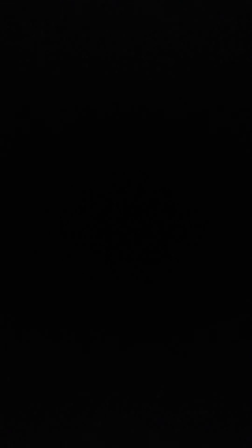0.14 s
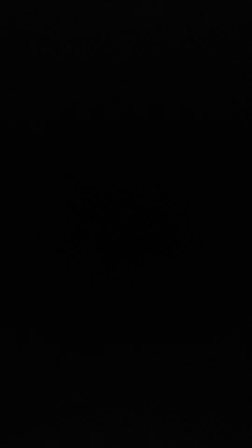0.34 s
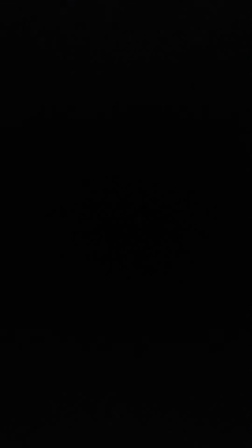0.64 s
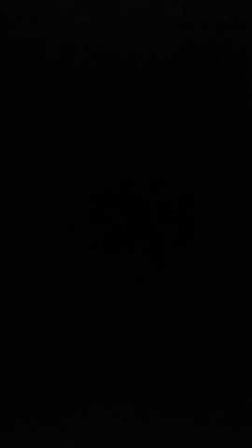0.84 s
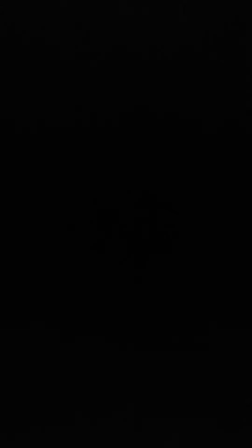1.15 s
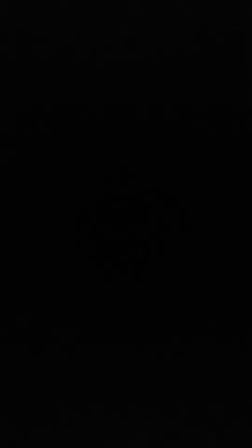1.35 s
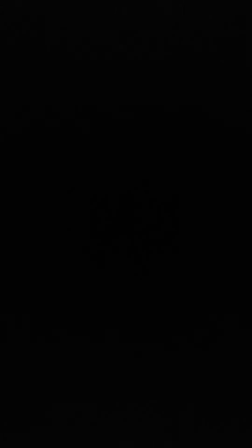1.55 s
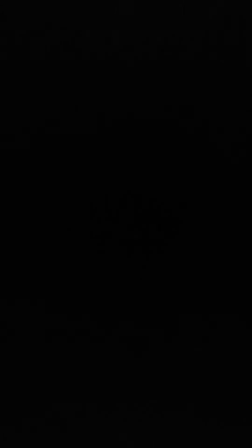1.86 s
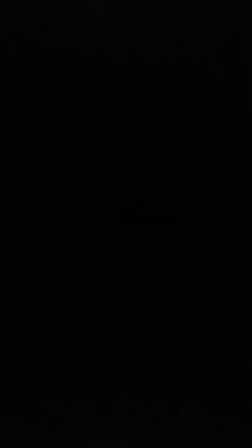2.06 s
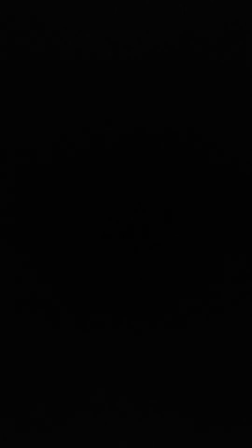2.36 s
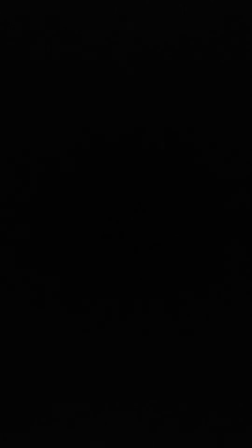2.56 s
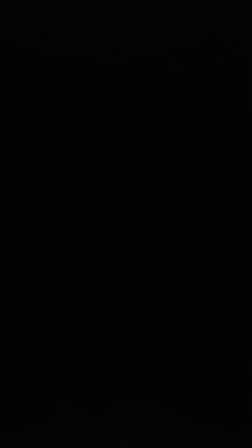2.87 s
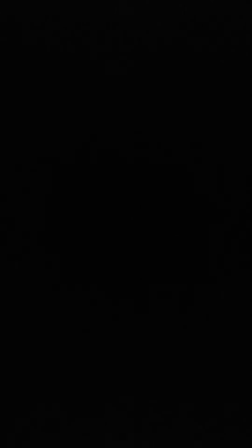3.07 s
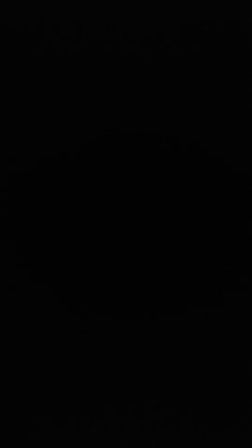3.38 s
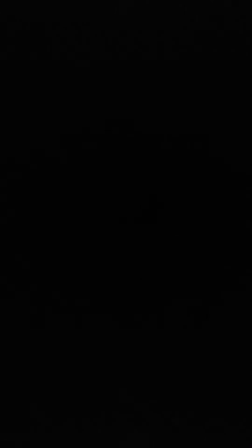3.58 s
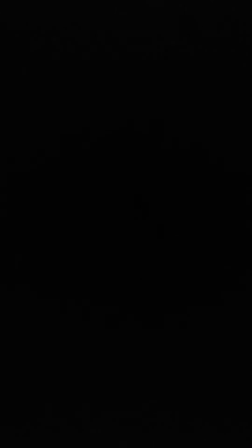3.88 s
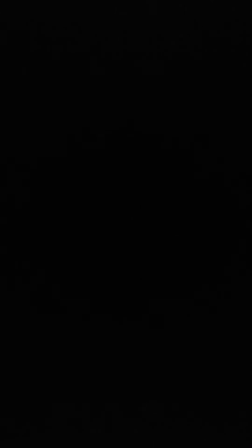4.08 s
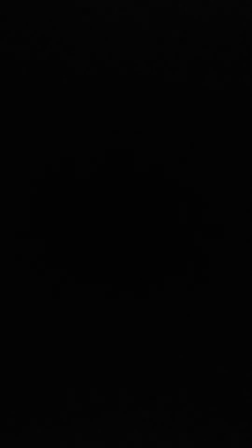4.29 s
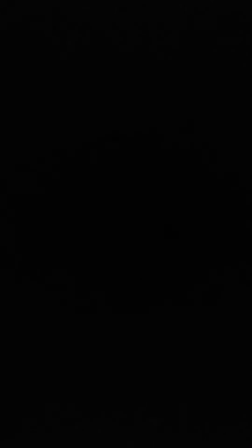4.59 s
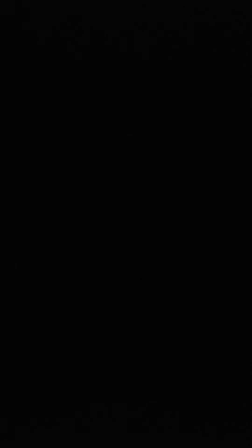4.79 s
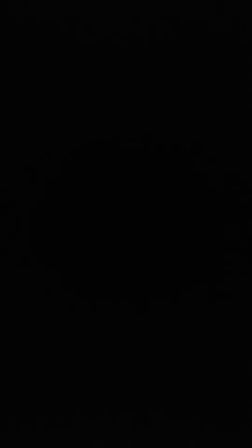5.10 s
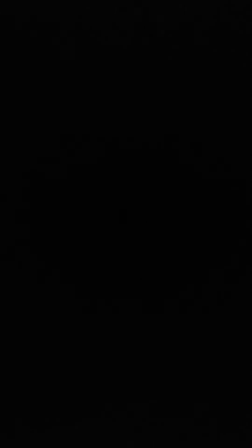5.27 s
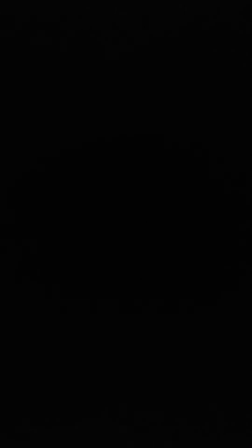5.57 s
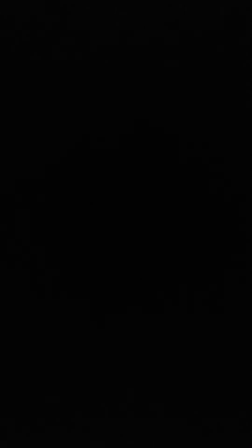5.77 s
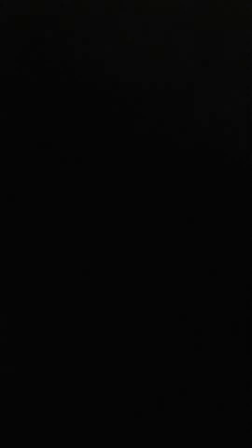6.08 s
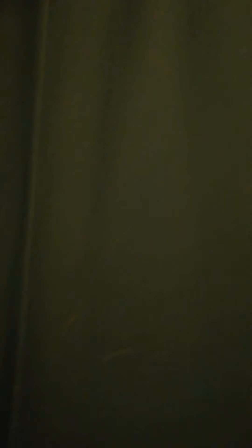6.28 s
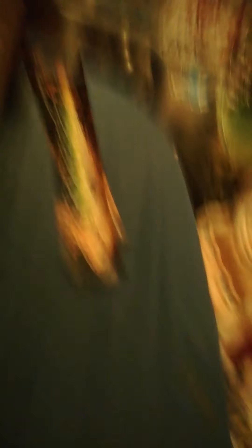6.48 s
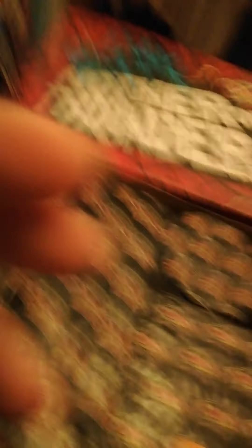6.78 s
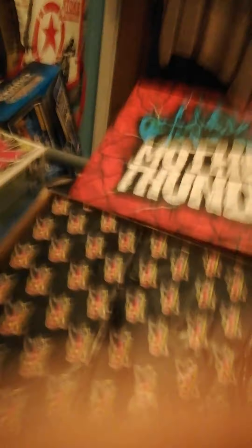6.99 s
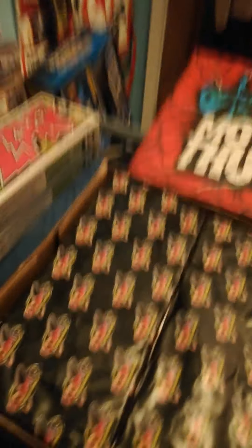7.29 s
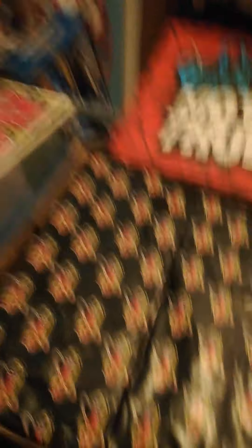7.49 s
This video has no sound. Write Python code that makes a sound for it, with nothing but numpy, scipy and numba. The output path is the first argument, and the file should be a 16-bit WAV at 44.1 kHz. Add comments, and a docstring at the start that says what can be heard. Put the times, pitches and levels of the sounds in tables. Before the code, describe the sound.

A phone bumps down close by, then a tight cardboard box lid is rubbed, knocked and worked off in a small, quiet room.

```python
"""Bumps and rubbing come first: a phone is set down in a small room, its case right by the microphone ports.
A tight cardboard lid knocks, judders off its box as it sticks and slips, and is put aside.
Fingertips swipe over the card. Then the phone is picked up, and its case creaks in a few sharp ticks.
Hands keep up a low rumble, over quiet room air, an appliance's hum and a fan's whirr."""
import sys
import numpy as np
from scipy import signal
from scipy.fft import rfft, irfft, next_fast_len
from scipy.io import wavfile
from numba import njit

SR = 44100
rng = np.random.default_rng(int(sys.argv[2]) if len(sys.argv) > 2 else 0)


def wav_out(sig):
    """Save sig, one row per channel (or a flat mono array), as 16-bit PCM at SR to the path in sys.argv[1]."""
    wavfile.write(sys.argv[1], SR, np.round(np.clip(np.atleast_2d(sig).T, -1, 1) * 32767).astype(np.int16))


N = 337188
TIME = np.arange(N) / SR
RING_TIME = TIME[:16384]  # the clock for one short sound [s]


# Tone of the tick where the phone is hit: (frequency [Hz], level [dB])
CONTACT_TONE = [(150, 2), (650, 2.5), (1200, -0.5), (2200, -12), (4500, -18), (10000, -16.5), (16000, -41)]
# Blows to the phone: (time [s], rocking [dB], rocking pitch [Hz], case knock [dB], contact tick [dB])
PHONE_BUMPS = [(0.019, -20.5, 197, -18.5, -21.5), (0.037, -17.5, 225, -23, -12.5),
               (0.257, -21, 182, -22, -21), (0.387, -25, 191, -40, -51), (0.397, -28, 198, -37, -30),
               (0.621, -19.5, 223, -31, -47), (0.642, -19.5, 124, -35, -47), (0.68, -18, 212, -39, -51),
               (0.689, -12, 208, -20, -48), (0.811, -24.5, 215, -32, -32), (0.856, -20.5, 130, -21.5, -35),
               (1.024, -24, 247, -42, -51), (1.077, -10.5, 165, -48, -39), (1.485, -34, 294, -61, -35.5),
               (1.75, -22, 197, -33, -36), (1.884, -22, 203, -32, -43), (2.36, -27, 135, -33, -58),
               (2.683, -17, 149, -22.5, -34), (2.71, -23.5, 234, -41, -52), (3.098, -43, 240, -48, -66),
               (3.538, -29, 170, -28, -56), (3.676, -23.5, 94.5, -31, -37), (4.192, -31.5, 83, -33.5, -56),
               (4.442, -22, 152, -41, -38), (4.449, -19, 119, -21, -50), (5.584, -29.5, 73, -44, -48),
               (5.702, -25, 66.6, -60, -43), (5.917, -24, 133, -46, -32), (6.034, -29, 119, -44, -38),
               (6.193, -32.5, 205, -46, -40), (6.246, -30, 89, -63, -50), (6.293, -33, 86.6, -62, -68),
               (6.985, -48, 329, -34, -57), (7.041, -27.5, 163, -38, -55), (7.094, -27.5, 103, -25, -28),
               (7.483, -42.5, 101, -48, -50)]

def bumps():
    """A blow rocks the phone on its soft support for a cycle or so; the case knocks, the contact ticks."""
    case_hz, case_ring_s = 328, 0.021
    flex_gain = undb([[-9], [0]])  # the case bends more at the right port
    out = np.zeros((2, N))
    for s, db, hz, knock_db, tick_db in PHONE_BUMPS + bounces():
        cycles = RING_TIME * hz
        rocking = -np.sin(2 * np.pi * cycles) * cycles ** 2.76 * np.exp(-cycles / 0.21)
        knock_hz = case_hz * (1 + 0.17 * rng.standard_normal())
        knock = -np.sin(2 * np.pi * knock_hz * RING_TIME) * fade(case_ring_s) * flex_gain
        contact = rng.standard_normal((2, len(RING_TIME))) * fade(0.017) * 0.42
        contact[:, 0] -= 1  # a sharp click starts the tick
        tick = colour(contact, CONTACT_TONE)
        add(out, s, peak(rocking, db - .7) + peak(knock, knock_db - 2) + peak(tick, tick_db))
    return out + room(out, 0.15, 0.034, wet_db=-13.5)


def bounces(count=5, db=-5, hz=183, knock_db=-43, tick_db=-22.5, loss_db=2.5):
    """The phone drops onto its support and bounces, each bump sooner and weaker than the last."""
    times = slip_times(start=1.097, length=1, gap=.0135, growth=.88)[:count]
    losses = loss_db * np.arange(count)
    return [(s, db - loss, hz, knock_db - loss, tick_db - loss) for s, loss in zip(times, losses)]


# Tones of rasping card, a scratching edge and hissing ports: (frequency [Hz], level [dB])
RASP_TONE = [(120, -22), (300, 8.5), (430, 1), (560, 1.5), (800, -1.5), (1200, -3.5), (1650, -2),
             (2100, -4), (3000, -14), (5000, -25), (8000, -53), (16000, -66.5)]
SCRATCH_TONE = [(1000, -25.5), (2000, -8.5), (2900, -2.5), (3800, -3.5), (5200, -7), (7000, -10.5),
                (10000, -16), (16000, -59)]
HISS_TONE = [(1000, -41), (3000, -25.5), (5500, -18), (7500, -10), (9000, -5), (10200, 0.5), (11200, -6.5),
             (12500, -14), (14000, -17.5), (16000, -31)]
# Rubs as the phone is placed, the lid worked loose, the card stroked and the phone lifted:
# (start [s], rise [s], fall [s], rasp [dB], scratch [dB], rumble [dB], hiss [dB],
#  lean to the left [dB] of which each layer takes a share, rumble pitch [Hz], rasp pitch [Hz])
RUB_STROKES = [ (.015, 0.028, 0.063, -34.5, -45, -33.5, -40.5, 15, 215, 990),
               (.055, 0.022, 0.064, -35.5, -40.5, -37.5, -41, 10, 198, 1200),
               (0.128, 0.02, 0.031, -43, -50, -38, -45.5, 10, 163, 1330),
               (.195, 0.053, .03, -61, -56, -50, -44.5, 19, 199, 1300),
               (.246, 0.016, 0.047, -41, -37.5, -49, -38.5, 7, 193, 1300),
               (.265, 0.02, .04, -56, -36.5, -35.5, -42, 7, 167, 1340),
               (.345, .015, 0.025, -45, -49, -47, -38.5, 16, 180, 1050),
               (0.383, 0.024, 0.029, -29, -34.5, -31.5, -31, 17, 176, 1380),
               (0.419, 0.018, 0.028, -29.5, -55, -36.5, -43, 10, 162, 1300),
               (.472, 0.018, 0.062, -50, -51, -37.5, -46, 15, 100, 1370),
               (.51, 0.018, 0.048, -31, -53, -31, -43, 12, 119, 1170),
               (.555, 0.03, 0.028, -45.5, -51, -40, -40, 9, 195, 1160),
               (.61, 0.024, 0.092, -33, -42, -39, -49, 5, 165, 1570),
               (0.671, 0.016, 0.072, -29.5, -34, -28.5, -36, 3.5, 201, 1520),
               (0.787, 0.023, 0.094, -30.5, -34, -30.5, -30, 12, 145, 1070),
               (.80, 0.09, 0.15, -48, -36, -35.5, -28, 9, 140, 1350),
               (0.899, 0.043, 0.045, -43, -51, -32.5, -26, 9, 114, 1490),
               (0.984, 0.025, 0.068, -41, -36.5, -38, -60, 4, 156, 1230),
               (1.04, 0.027, 0.068, -43, -38.5, -34, -30, 7, 170, 1160),
               (1.065, 0.048, 0.12, -34.5, -35.5, -31, -33.5, 5, 138, 1140),
               (1.159, 0.05, 0.14, -46, -41.5, -36.5, -39, 6.5, 125, 1320),
               (1.319, 0.022, 0.041, -62, -75, -38.5, -66, 13, 200, 1190),
               (1.406, 0.016, 0.21, -62, -64, -43, -54, 9, 104, 950),
               (1.63, 0.024, 0.11, -57, -59.5, -54.5, -56, 11, 89, 1080),
               (1.744, 0.015, 0.14, -48, -47.5, -43, -48, 10, 214, 980),
               (1.80, 0.029, 0.054, -35, -41.5, -32.5, -51, 15, 244, 800),
               (1.87, 0.024, 0.031, -39, -64, -42, -65, -5, 198, 731),
               (1.95, .09, 0.2, -66, -68, -57.5, -63, 8, 84, 1120),
               (2.185, 0.01, 0.16, -52, -57, -43.5, -55.5, 15, 109, 850),
               (2.35, 0.021, 0.067, -44, -53.5, -37, -49.5, 8, 150, 800),
               (2.49, 0.03, 0.12, -49.5, -51, -41.5, -50.5, 14, 157, 726),
               (2.53, 0.075, 0.16, -51.5, -46.5, -45.5, -48, 17, 229, 880),
               (2.62, .05, 0.086, -41, -43.5, -45.5, -42, 15, 235, 900),
               (2.699, 0.037, 0.062, -49, -47.5, -40, -48.5, 10, 179, 1280),
               (3.389, 0.0091, 0.065, -54, -39, -56, -48, 7, 296, 1400),
               (3.63, 0.053, 0.089, -48, -58, -40, -54, -9, 102, 950),
               (3.70, .035, 0.091, -49, -58, -37, -51.5, -27, 138, 760),
               (3.765, .035, 0.071, -52, -62, -58, -55.5, -17, 115, 1060),
               (3.855, 0.057, 0.084, -42.5, -53, -37, -50, -18, 110, 650),
               (4.018, 0.039, 0.064, -40, -49, -35.5, -46.5, -20, 129, 975),
               (4.18, .05, 0.063, -51, -57.5, -41, -52.5, -6, 110, 800),
               (4.25, 0.052, 0.084, -59, -68, -48.5, -59, 5, 100, 1100),
               (4.375, .035, 0.11, -46.5, -60, -39.5, -52, -18, 116, 810),
               (4.465, 0.019, 0.058, -45, -53, -47, -64, -11, 105, 850),
               (4.515, 0.036, 0.046, -44.5, -54, -48, -53, -13, 138, 1370),
               (4.925, 0.028, 0.092, -59, -48.5, -38, -51, 6, 120, 1330),
               (5.245, 0.064, 0.087, -57, -56.5, -54, -55.5, 6, 190, 950),
               (5.686, 0.024, 0.048, -51.5, -72, -39, -59.5, -21, 90, 1030),
               (5.745, 0.043, 0.22, -46.5, -60, -42, -55.5, -17, 124, 925),
               (5.898, 0.017, 0.029, -32.5, -56, -44, -54, -27, 119, 1290),
               (5.92, 0.031, 0.026, -35, -47.5, -31.5, -42.5, -15, 126, 1180),
               (6.016, 0.051, 0.094, -50.5, -57, -39, -49, -4, 130, 1150),
               (6.10, 0.092, 0.12, -57, -64, -46, -64, -3, 131, 800),
               (6.25, .10, .17, -68, -70, -50, -68, 6, 80, 1520),
               (6.55, 0.16, 0.31, -62, -69, -53.5, -60, -6, 75, 1500),
               (6.96, 0.031, 0.21, -60, -69, -55.5, -61.5, 9, 215, 1150),
               (7.19, 0.036, 0.09, -73, -77, -63, -57, 4, 100, 1400),
               (7.431, 0.039, 0.05, -60, -66, -64, -50, -15, 141, 1430),
               (7.50, 0.053, 0.044, -67, -76, -73, -55, -20, 127, 1340),
               (7.59, 0.039, .09, -61, -70, -54.5, -48, -14, 89, 1430)]

def rubbing():
    """Each stroke shakes the phone, rasps on the card and hisses in the ringing ports."""
    rasp_db, scratch_db, press_db, hiss_db, pan_db, grip_hz, rasp_hz = np.array(RUB_STROKES).T[3:]
    clock = TIME[::32]
    sliding = stroke_power(clock)
    pressing = stroke_power(clock, slow=1.23)  # pressure builds and eases more slowly
    sides = np.array([[1], [-1]])

    def loudness(power, db, pan_share):
        """Gain at each port: the strokes add up in power, each leaning to its own side."""
        gain = undb(sides * pan_share * pan_db / 2)
        gain = 2 * undb(db) * gain / np.sqrt(np.sum(gain ** 2, axis=0))
        return np.array([np.interp(TIME, clock, np.sqrt(port)) for port in gain ** 2 @ power])

    def pitch(power, db, hz):
        """The pitch leans toward the loudest stroke of the moment."""
        weight = undb(db)[:, None] ** 2 * power
        return np.interp(TIME, clock, hz @ weight / weight.sum(axis=0))

    # the phone rings on whatever holds it: higher on card, lower in the soft hand
    rumble = undb(-1.5) * loudness(pressing, press_db, 0) * shaking(pitch(pressing, press_db, grip_hz))
    drag = colour(friction(900, grain_db=2, patchy_db=2.86), RASP_TONE)
    # the bending case pushes one port while it pulls the other
    drag = drag - colour(drag[::-1], [(300, -6), (550, 0), (1200, -2.5), (3000, -28.5)])
    # the card rings, and its pitch wanders as the contact travels
    card_hz = pitch(sliding, rasp_db, rasp_hz) * np.exp(0.12 * walk(40))
    card_ring = np.array([resonance(x, card_hz, damping=0.57) for x in drag])
    drag = undb(-1.5) * unit(drag + 2.7 * card_ring)
    scratch = undb(-3) * unit(colour(friction(1200, grain_db=2.7, patchy_db=1.9), SCRATCH_TONE))
    rasp = loudness(sliding, rasp_db, 0.59) * drag + loudness(sliding, scratch_db, 0.46) * scratch
    # single fibres snag, about 220 times a second, and add a bright crackle to the hiss
    snags = rng.standard_normal((2, N)) * (rng.random(N) < 220 / SR)
    grains = unit(colour(friction(1500, grain_db=1.2, patchy_db=2.5), HISS_TONE))
    grains += undb(-9) * unit(colour(snags, TICK_TONE))
    # the right port rings less sharply and lets more of the highest treble through
    grains[1] = unit(colour(grains[1], [(5000, 2), (10200, -2.5), (12000, 5.5), (16000, 3)]))
    hiss = loudness(sliding, hiss_db, 0.88) * grains
    return rumble + rasp + hiss + room(rasp, 0.54, 0.3, wet_db=-14)


def stroke_power(clock, slow=1, depth_db=17.5):
    """Power of every stroke over time: it swells to its top speed, then dies away."""
    start, rise, fall = np.array(RUB_STROKES).T[:3, :, None]
    after_top = (clock - start - rise) / slow
    # exponents above 1 make the stroke linger near its top speed
    rising = (np.maximum(-after_top, 0) / rise) ** 1.31
    falling = (np.maximum(after_top, 0) / fall) ** 1.12
    return undb(-depth_db * np.minimum(rising + falling, 10)) ** 2


def friction(grain_hz, grain_db, patchy_db):
    """Fibres catch and let go: noise broken into grains that come in patches."""
    return rng.standard_normal((2, N)) * undb(grain_db * walk(grain_hz) + patchy_db * walk(70))


# Tones of cracking card and its snapping edge: (frequency [Hz], level [dB])
CRACK_TONE = [(200, -21), (500, -12.5), (800, 6), (1050, -3.5), (1350, 5.5), (1800, -5.5), (2250, -1),
              (2950, -4), (3500, -4.5), (4300, -7.5), (5300, -24), (9000, -20), (16000, -65)]
SNAP_TONE = [(1500, -35), (3800, -3), (5200, -11.5), (7000, -7.5), (10200, -2.5), (12000, -11.5),
             (16000, -28)]
# Notes the box and lid ring at: (pitch [Hz], level [dB], time to fade by 60 dB [s])
BOX_NOTES = [(172.6, -7, 0.207), (262.6, -14.5, 0.147), (297, -11, 0.099), (349.5, -2, 0.11),
             (425.5, 5, 0.047), (494, -0.5, 0.026), (695, -1.5, 0.063), (953, -13.5, 0.051)]
# Knocks of the lid: (time [s], crack [dB], crack pitch [Hz], panel boom [dB], edge snap [dB])
LID_KNOCKS = [(0.2567, -21, 2900, -25, -50), (0.2701, -30, 2570, -47, -27), (0.3965, -32, 2320, -47, -39),
              (0.4128, -23, 3850, -41, -26.5), (0.5263, -40, 1700, -49, -47), (0.626, -27, 2150, -56, -54),
              (0.682, -22.5, 2210, -47, -39), (0.8104, -27.5, 3970, -40, -25),
              (1.001, -24, 2980, -28.5, -49), (1.749, -34, 940, -30, -53), (1.7575, -24, 2960, -27.5, -49),
              (1.7719, -36, 3340, -30.5, -45), (1.799, -43, 2330, -29, -52), (1.8271, -28, 2800, -29, -37),
              (1.8901, -48, 1930, -26.5, -62), (2.683, -34, 1900, -31, -54),
              (3.3902, -21.5, 2830, -25, -48), (3.5349, -30.5, 1760, -24, -70),
              (4.9204, -27, 1750, -49, -43.5), (4.9341, -26, 2060, -40.5, -41),
              (5.0813, -19.5, 1730, -31.5, -23.5), (5.091, -49, 2230, -56, -25.5),
              (5.1157, -27, 1770, -35.5, -52), (5.3446, -43, 2460, -38, -55)]

def lid():
    """Every knock or slip cracks the card, snaps its edge and sets the panels booming."""
    panels, edges = np.zeros(N), np.zeros((2, N))
    give = 1 - fade(0.0021)  # card gives way over a millisecond or so
    for s, crack_db, crack_hz, boom_db, snap_db in LID_KNOCKS + judder():
        fibres, burst = rng.standard_normal((2, 2, len(RING_TIME)))
        boom = np.zeros(len(RING_TIME))
        for hz, db, t60 in BOX_NOTES:
            # the grip and the spot that is struck shift each note a little
            louder_db, detune = rng.standard_normal(2) * (0.6, 0.039)
            boom += undb(db + louder_db) * np.sin(2 * np.pi * hz * (1 + detune) * RING_TIME) * fade(t60)
        fibres = fibres + 0.2 * fibres[::-1]  # each port hears a little of the other side
        crack = colour(fibres * give * (fade(0.016) + undb(-37) * fade(.08)), CRACK_TONE)
        # the bent wall rings briefly at a pitch set by its free length
        wall_hz = np.full(len(RING_TIME), float(crack_hz))
        crack = crack + 2.25 * np.array([resonance(x, wall_hz, damping=0.15) for x in crack])
        snap = colour(burst * give * (fade(0.013) + undb(-19.5) * fade(0.15)), SNAP_TONE)
        add(panels, s, chatter(peak(boom, boom_db + 7.5), gap_s=.008, db=-12.5, count=2))
        add(edges, s, chatter(peak(crack, crack_db - .5), gap_s=.006, db=-18.5, count=3))
        add(edges, s, peak(snap, snap_db + 2.5))
    booms = from_box(panels, pan_db=-2.8)
    return booms + edges + room(booms, 0.18, 0.25, wet_db=-5) + room(edges, 0.21, 0.19, wet_db=0.42)


# Runs of lid slips: (start [s], length [s], first gap [s], gap growth [ratio], crack [dB], boom [dB])
LID_JUDDERS = [(3.404, .128, .0156, 1.1, -35, -31), (3.558, .09, .0235, .92, -33.5, -32.5)]

def judder(crack_hz=2900, snap_db=-57, scatter_db=2.1):
    """The tight lid sticks and slips, making a run of small, uneven knocks."""
    return [(s, crack_db + scatter_db * rng.standard_normal(), crack_hz, boom_db, snap_db)
            for start, length, gap, growth, crack_db, boom_db in LID_JUDDERS
            for s in slip_times(start, length, gap, growth)]


def chatter(sound, gap_s, db, count):
    """A slip is followed by a few weaker ones, unevenly spaced."""
    lags = np.cumsum(rng.uniform(.5, 1.5, count)) * gap_s
    out = sound.copy()
    for k, lag in enumerate(lags):
        start = max(int(lag * SR), 1)
        out[..., start:] += undb(db - 0.58 * k) * sound[..., :-start]
    return out


# Swipes and squeaks: (start [s], length [s], slip rate scale [Hz], level [dB], left minus right [dB])
CARD_SWIPES = [(0.405, .016, 3650, -30.5, 1), (3.715, 0.049, 849, -46.5, -11),
               (3.876, 0.076, 549.5, -46, -8), (4.029, 0.066, 1080, -44.5, -11.5),
               (4.187, 0.064, 857, -53, -12.5), (4.393, 0.095, 1034, -46.5, -5),
               (4.529, 0.035, 1850, -62, -9), (6.085, 0.11, 187.7, -43.5, 0)]

def swipes():
    """A fingertip sticks and slips on the card, faster as it speeds up and slower as it stops."""
    out = np.zeros((2, N))
    jitter = np.exp(.11 * walk(900))
    grip = undb(3 * walk(300))
    for s, length, hz, db, pan_db in CARD_SWIPES:
        on = (TIME >= s) & (TIME < s + length)
        speed = np.sin(np.pi * (TIME[on] - s) / length)
        slips = np.cumsum(hz * (0.13 + 0.76 * speed) * jitter[on]) / SR
        sawtooth = (slips % 1 - .5) * grip[on]
        # slow swipes sound softer, with less treble
        drag = colour(sawtooth, [(0.062 * hz, -3), (hz, 0), (2 * hz, -9), (6 * hz, -25)])
        out[:, on] += from_box(undb(db) * unit(drag * speed), pan_db)
    return out + room(out, 0.52, 0.26, wet_db=-15.5)


# Tone of a dry tick: (frequency [Hz], level [dB])
TICK_TONE = [(500, -49), (2000, -25.5), (4000, -18), (5600, -14), (6600, -7.5), (7300, -10), (8000, -5.5),
             (8800, -6.5), (10000, 0.5), (11000, -1), (12400, -11.5), (13200, -16), (16000, -40)]
# Single ticks of the case: (time [s], level [dB])
CASE_TICKS = [(2.177, -35), (2.3896, -24), (2.496, -24), (2.514, -29), (4.261, -26.5), (6.185, -31),
              (6.312, -34.5), (7.032, -37), (7.1027, -1), (7.378, -38.5), (7.484, -33)]
# Creaks, each an evenly spaced run of ticks: (start [s], length [s], gap [s], level [dB])
CASE_CREAKS = [(7.1108, .04, .00878, -14.5), (7.1976, .019, .0074, -23.5)]

def creak(scatter_db=2.5):
    """The gripped case slips in very short, dry ticks next to the left port, singly or in runs."""
    left = np.zeros(N)
    runs = [(s, db + scatter_db * rng.standard_normal())
            for start, length, gap, db in CASE_CREAKS for s in slip_times(start, length, gap)]
    for s, db in CASE_TICKS + runs:
        tick = colour(rng.standard_normal(len(RING_TIME)) * fade(0.0039), TICK_TONE)
        add(left, s, peak(tick, db))
    direct = np.array([left, undb(-32) * far_port(left)])
    return direct + room(direct, .3, 0.32, wet_db=-23)


# How strongly the hands rumble: (time [s], level [dB])
HAND_LEVELS = [(0.0, -42), (0.32, -51), (0.74, -37), (1.0, -38), (1.47, -56), (1.85, -43), (2.02, -65),
               (2.66, -49), (2.94, -58), (3.4, -69), (3.55, -50), (4.34, -47), (4.6, -77), (5.38, -49.5),
               (5.72, -38.5), (6.11, -45.5), (7.36, -63.5), (7.64, -65)]

def handling(grip_hz=84.6):
    """Hands shifting on the box and the phone keep up a low rumble."""
    level_db = np.interp(TIME, *np.transpose(HAND_LEVELS)) - 2.5
    return undb(level_db) * shaking(grip_hz * np.exp(0.092 * walk(5.1)))


# Tone of the shaking phone: (frequency [Hz], level [dB])
RUMBLE_TONE = [(20, 11.5), (45, 14.5), (90, -0.5), (150, -1.5), (240, 0.5), (310, 0), (420, -2.5),
               (700, -8), (2000, -55)]

def shaking(hz):
    """Friction shakes the phone at its natural pitch and rocks one port against the other."""
    hz = np.clip(hz, 40, 450)
    push = friction(150, grain_db=3.1, patchy_db=2)
    # the soft support muffles whatever lies far from that pitch
    ringing = np.array([resonance(resonance(x, hz, 0.55), hz, 2.33) for x in push])
    shake, rock = unit(colour(ringing / np.sqrt(hz), RUMBLE_TONE))
    rock = colour(rock, [(40, -15.5), (130, -14.5), (260, -10.5), (450, 5.5)])
    return np.array([shake + rock, shake - rock])


# Tone of the room's air: (frequency [Hz], level [dB])
AIR_TONE = [(15, -63), (25, -0.5), (92, -2.5), (111, -8), (145, -8.5), (195, 2), (256, -3.5), (293, -3.5),
            (363, -8.5), (405, -6.5), (754, -12), (1330, -14.5), (2610, -19.5), (2990, -20.5), (16000, -33)]

def room_air(level_db=-59.5):
    """A soft rush: the bass is alike at both ports; near 500 Hz they move against each other."""
    shared, side = colour(rng.standard_normal((2, N)), AIR_TONE)
    side = colour(side, [(60, -33), (200, -12.5), (450, 0.5), (700, -2.5), (1400, 1), (16000, 0)])
    shared = colour(shared, [(400, -1), (620, -6), (900, 0.5), (1350, 4), (2000, 0.5), (16000, -0.5)])
    return undb(level_db + 0.17 * walk(8.5)) * np.array([shared + side, shared - side]) / np.std(shared)


# Tone of the fan: (frequency [Hz], level [dB])
FAN_TONE = [(100, -9), (370, 9), (520, -8), (680, -32), (1000, -13), (1450, 7.5), (2200, 2.5), (5000, -29),
            (16000, -27)]
# Notes in the hum: (pitch [Hz], level [dB])
HUM_NOTES = [(118.4, -82), (296.1, -88), (409.1, -72)]

def appliances():
    """An appliance hums, wavering a little; a fan's whirr grows once the phone is lifted."""
    hum = np.zeros(N)
    for hz, db in HUM_NOTES:
        gain = undb(db + 2.8 * walk(3.5)) * np.sqrt(2)
        hum += gain * np.sin(2 * np.pi * hz * TIME + .5 * walk(1.73))
    whirr = unit(colour(rng.standard_normal((2, N)), FAN_TONE))
    return hum + whirr * undb(np.interp(TIME, [6.1, 6.9], [-72, -62]))


def room(x, t60, treble_t60, wet_db):
    """Blurred echoes of a small furnished room; lows and treble each have their own fade time [s]."""
    noise = rng.standard_normal((2, len(RING_TIME)))
    low = signal.sosfilt(signal.butter(1, 2500, fs=SR, output="sos"), noise)
    onset = np.clip(RING_TIME / 0.0017 - 1, 0, 1)
    tail = (low * fade(t60) + (noise - low) * fade(treble_t60)) * onset
    # long waves are alike at both ports
    side = signal.sosfilt(signal.butter(1, 350, "high", fs=SR, output="sos"), tail[1])
    tail = unit(np.array([tail[0] + side, tail[0] - side])) / np.sqrt(len(RING_TIME))
    return undb(wet_db) * signal.fftconvolve(x.mean(axis=0)[None], tail, axes=1)[:, :N]


def from_box(x, pan_db):
    """Sound from the box reaches the right port first."""
    return np.array([far_port(x) * undb(pan_db / 2), x * undb(-pan_db / 2)])


def far_port(x, lag_samples=28):
    """Sound arrives a little later at the farther port."""
    return np.roll(x, lag_samples)


def slip_times(start, length, gap, growth=1):
    """Times of a run of slips; each gap is the one before times growth."""
    lags = np.concatenate([[0], np.cumsum(gap * growth ** np.arange(20))])
    return start + lags[lags < length]


@njit
def resonance(x, hz, damping):
    """Band-pass filter that rings at a pitch that may move; less damping rings longer."""
    out, band_state, low_state = np.empty(len(x)), 0., 0.
    for i in range(len(x)):
        step = np.tan(np.pi * hz[i] / SR)
        band = (band_state + step * (x[i] - low_state)) / (1 + step * (step + damping))
        band_state = 2 * band - band_state
        low_state += 2 * step * band
        out[i] = damping * band
    return out


def colour(x, points):
    """Shape a sound's tone along a curve of (frequency [Hz], level [dB]) points."""
    size = 2 * next_fast_len(x.shape[-1] // 2 + 1)
    hz, db = np.transpose(points)
    freq = np.maximum(np.fft.rfftfreq(size, 1 / SR), 1)
    cepstrum = irfft(np.log(undb(np.interp(np.log(freq), np.log(hz), db))))
    # folding makes the filter ring after a sound, never before it
    cepstrum[1:size // 2] *= 2
    cepstrum[size // 2 + 1:] = 0
    return irfft(rfft(x, size) * np.exp(rfft(cepstrum)))[..., :x.shape[-1]]


def undb(db):
    """Turn decibels into a gain."""
    return 10 ** (np.asarray(db) / 20)


def unit(x):
    """Scale to an average (rms) level of 1."""
    return x / np.sqrt(np.mean(x ** 2))


def peak(x, db):
    """Scale so that the average of the ports peaks at db."""
    return x * undb(db) / np.abs(np.atleast_2d(x).mean(axis=0)).max()


def fade(t60):
    """Die away by 60 dB every t60 seconds."""
    return np.exp(-np.log(1000) * RING_TIME / max(t60, 1e-4))


def walk(rate):
    """Wander about zero, by roughly 1, through rate random points a second."""
    knots = rng.standard_normal(N // 8)
    return np.interp(TIME * rate, np.arange(len(knots)), knots)


def add(out, s, sound):
    """Mix a sound in at s seconds."""
    start = max(int(s * SR), 0)
    part = sound[..., :max(N - start, 0)]
    out[..., start:start + part.shape[-1]] += part


def scene():
    """All the sounds together at the left and right ports."""
    return rubbing() + handling() + bumps() + lid() + swipes() + creak() + room_air() + appliances()


def record(dry):
    """The phone rounds off the loudest peaks and cuts the highest treble."""
    ceiling, top_hz = .8, 16200
    rounded = dry / (1 + (dry / ceiling) ** 6) ** (1 / 6)
    return signal.sosfilt(signal.ellip(8, .2, 70, top_hz, fs=SR, output="sos"), rounded)


dry = scene()
out = record(dry)
wav_out(out)
```